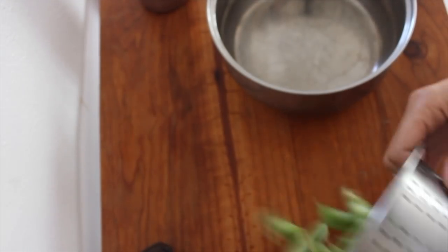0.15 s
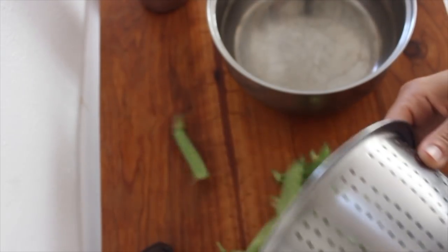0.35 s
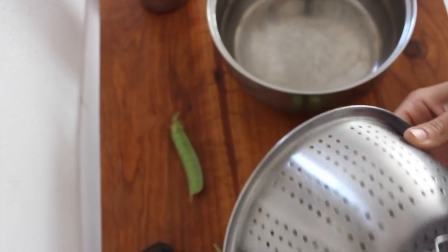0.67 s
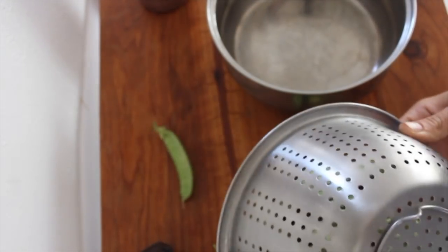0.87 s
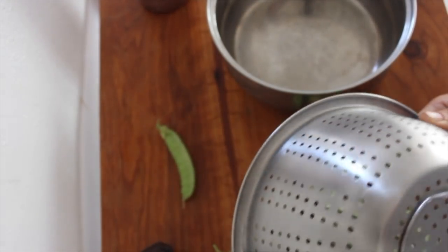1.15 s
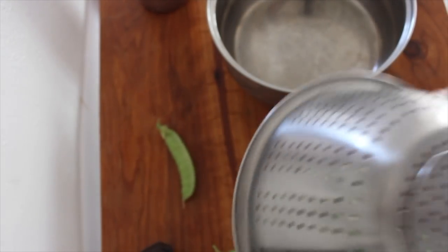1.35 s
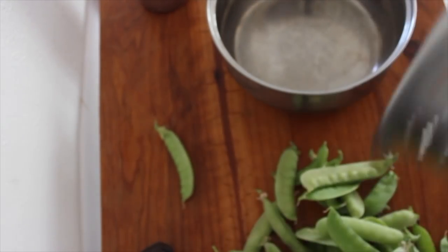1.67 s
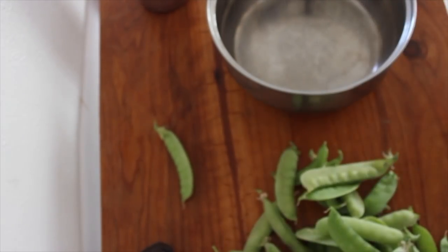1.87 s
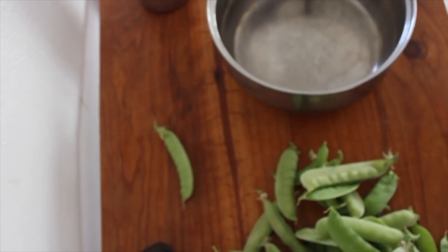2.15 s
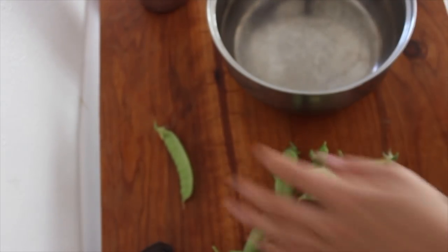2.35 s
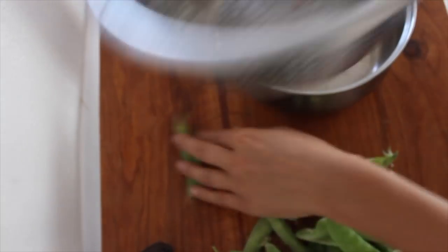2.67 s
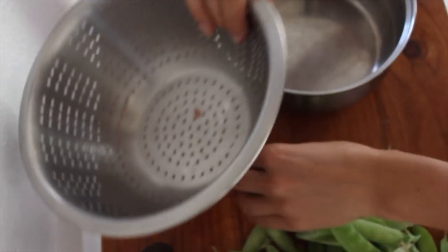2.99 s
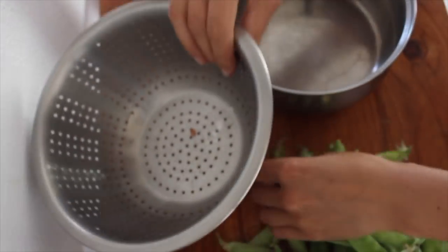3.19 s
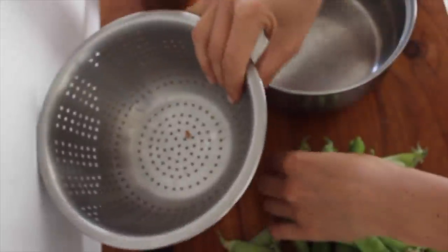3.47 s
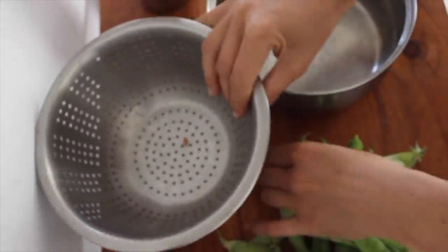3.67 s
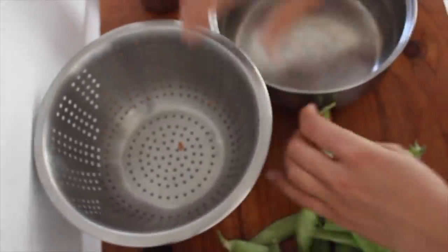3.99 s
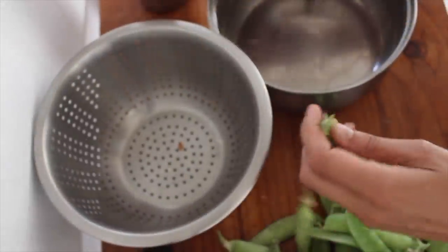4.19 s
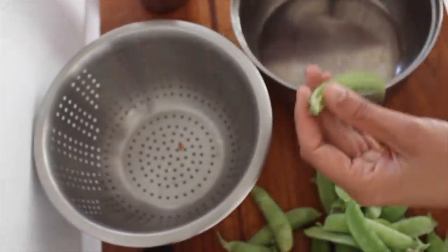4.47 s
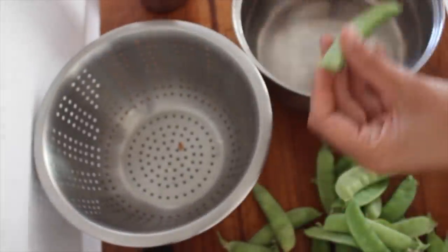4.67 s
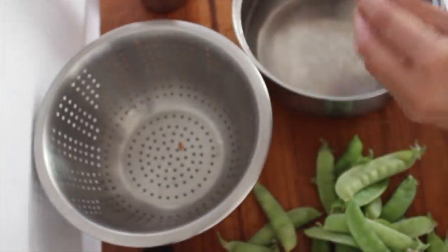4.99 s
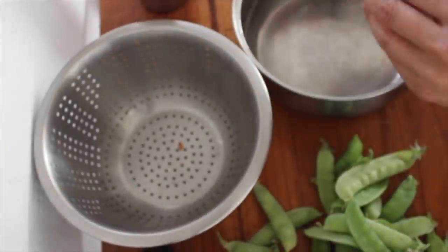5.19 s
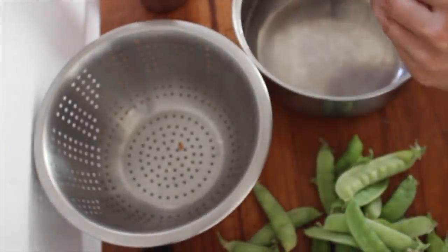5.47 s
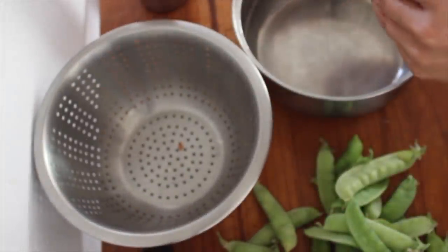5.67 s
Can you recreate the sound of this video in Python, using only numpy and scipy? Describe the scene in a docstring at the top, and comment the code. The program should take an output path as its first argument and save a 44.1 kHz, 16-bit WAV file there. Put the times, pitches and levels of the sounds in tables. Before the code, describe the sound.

A clattering spill of pods on wood fades to small ticks, followed by metallic clinks, short scrapes and dull table knocks in a quiet room.

```python
"""Pea pods are tipped from a steel colander onto a wooden table: each landing excites decaying table modes.
The colander is lifted, set down against a steel bowl and pushed along the wood, while a hand sweeps the pods
together: steel modes are struck or scraped, and filtered random grains make the rolling, dragging and rubbing.
Noise puffs are flicking pod tips; a decaying noise tail is the small room; noise bands are insects far off
through an open window, over a smooth hiss."""
import sys
import numpy as np
from scipy import signal
from scipy.fft import rfft, irfft
from scipy.io import wavfile

SR = 44100
rng = np.random.default_rng(int(sys.argv[2]) if len(sys.argv) > 2 else 0)


def waveform_to_disk(signal):
    """Save audio, clipped to [-1, 1], as 16-bit WAV at the path in sys.argv[1]."""
    frames = np.transpose(np.atleast_2d(signal))
    scaled = np.clip(frames, -1, 1) * 32767
    samples = np.round(scaled).astype(np.int16)
    wavfile.write(sys.argv[1], SR, samples)


def attenuation_scalar(level_db):
    """Turn a level in dB into a linear amplitude multiplier (20 dB per decade)."""
    decades = np.asarray(level_db, float) / 20
    return 10 ** decades


N = 257544

# Pods and colander landing on the table; levels are relative, the pitch is the one the struck spot favours:
# start_s, level_db, hardness_db, pitch_hz
LANDINGS = [(0.057, 5, -8.5, 292), (0.208, -16, -13, 322), (0.256, -4, -15, 750),
            (0.2768, -1.5, -12.5, 358), (0.2912, -7.5, -14, 407), (0.329, -9.5, -8, 494),
            (0.363, -9.5, -21, 293), (0.402, -1.5, -23, 330), (0.478, -16.5, -30, 280),
            (0.537, -11.5, -35, 285), (0.639, -22, -27, 650), (0.694, -11, -13.5, 338),
            (0.832, -16.5, -19, 338), (0.861, -17.5, -14.5, 370), (0.883, -14, -11, 386),
            (1.024, -26, -21, 339), (1.137, -27, -20, 464), (1.373, -29.5, -13, 304),
            (1.422, -30, -15, 480), (1.46, -25.5, -12, 357), (1.658, -29.5, -18, 368),
            (1.919, -27, -10, 342), (2.641, -24.5, -22.5, 280), (2.911, -27, -8, 406),
            (3.097, -35, -35, 333), (3.377, -27, -16, 385), (3.5041, -17.5, -39, 251),
            (3.559, -24, -17, 248), (3.818, -27, -27, 282), (3.984, -13, -14, 179.4),
            (4.301, -19, -38, 317), (4.344, -15, -44, 286), (4.582, -24.5, -27, 380)]
# Modes of the table top: frequency_hz, level_db, t60_s
TABLE_MODES = [(189, -10.5, 0.18), (259, -6, 0.13), (330.1, -2, 0.092), (480, 3.5, 0.022), (666, 8, 0.011),
               (764, 7, 0.012), (927.6, -5.5, 0.012)]
# High rings of the perforated colander wall when struck: frequency_hz, level_db, t60_s
WALL_MODES = [(6260, -1.5, 0.013), (6790, -10.5, 0.08), (7960, -3.5, 0.04), (8400, -7, 0.024),
              (8530, -6.5, 0.09), (9000, 3, 0.0085)]
# Pods tumble until then; later the smooth steel foot and the hand drag, with softer contacts.
TUMBLE_END_S = 1.55


def rms_one(x):
    """Normalisation: scales a signal to a root mean square of 1."""
    return x / np.sqrt(np.mean(x ** 2) + 1e-20)


def band(x, low_hz, high_hz):
    """Linear filtering: a Butterworth band-pass."""
    edges_hz = [low_hz, min(high_hz, 0.45 * SR)]
    return signal.sosfilt(signal.butter(2, edges_hz, "band", fs=SR, output="sos"), x)


def drift(rate_hz):
    """Slow random fluctuation: noise through two equal low-pass poles, rms 1."""
    step = 40  # samples between values of the slow signal
    pole = np.exp(-2 * np.pi * rate_hz * step / SR)
    noise = rng.standard_normal(N // step + 2002)
    slow = signal.lfilter([1], [1, -2 * pole, pole * pole], noise)[2000:]  # drop the settling filter
    return np.interp(np.arange(N) / step, np.arange(len(slow)), rms_one(slow))


def ring(force, hz, t60_s):
    """Damped resonance: a unit click sets a decaying sine of initial height 1 ringing."""
    radius = attenuation_scalar(-60 / (t60_s * SR))
    angle = 2 * np.pi * hz / SR
    feedback = [1, -2 * radius * np.cos(angle), radius * radius]
    return signal.lfilter([0, np.sin(angle)], feedback, force + 1e-18)


def strike(modes, times_s, levels_db, spots_hz, slope_db, chatter_s, chatter_db):
    """Modal excitation: clicks favour modes near a spot pitch, then micro-bounces chatter and die away.

    slope_db is the loss per octave away from the spot pitch."""
    at = np.round(np.asarray(times_s) * SR).astype(int)
    out = np.zeros(N)
    luck_db = 1.5 * rng.standard_normal((len(at), len(modes)))
    shiver = attenuation_scalar(chatter_db) * rng.standard_normal(N)
    for k, (hz, mode_db, t60_s) in enumerate(modes):
        distance_db = slope_db * np.abs(np.log2(hz / spots_hz))
        clicks = np.zeros(N)
        clicks[at] = attenuation_scalar(levels_db + mode_db + luck_db[:, k] - distance_db)
        chatter = shiver * signal.lfilter([1], [1, -np.exp(-1 / (chatter_s * SR))], clicks + 1e-18)
        out += ring((-1) ** k * clicks + chatter, hz, t60_s)
    return out


def grains(per_s, spread_db):
    """Shot noise: random small contacts of uneven size and either sign, rms 1."""
    sizes = attenuation_scalar(spread_db * np.minimum(rng.exponential(1, N), 4))
    signed_sizes = sizes * rng.choice([-1, 1], N)
    return rms_one(signed_sizes * (rng.random(N) < per_s / SR))


def stroke(start_s, rise_s, fade_s, level_db):
    """Amplitude envelope: start sample, and a smooth rise followed by an exponential fade."""
    t = np.arange(round((rise_s + 6 * fade_s) * SR)) / SR
    rise = np.sin(np.pi / 2 * t / rise_s) ** 2
    fade = np.exp((rise_s - t) / fade_s)
    return round(start_s * SR), attenuation_scalar(level_db) * np.where(t < rise_s, rise, fade)


def air():
    """Spectral shaping: steady noise of room air and preamplifier, a smooth hiss."""
    # Relative power density of the hiss: frequency_hz, density_db (per Hz)
    hiss_curve = [(20, -1.5), (60, -4), (250, -2.5), (750, 1), (1250, 0.5), (1600, -2.5), (4000, -7.5),
                  (8000, -5.5), (15500, -7.5)]
    curve_hz, curve_db = np.transpose(hiss_curve)
    hz = np.maximum(np.arange(N // 2 + 1) * SR / N, 1)
    shape_db = np.interp(np.log(hz), np.log(curve_hz), curve_db)
    spectrum = rfft(rng.standard_normal(N)) * attenuation_scalar(shape_db)
    return attenuation_scalar(-56.5) * rms_one(irfft(spectrum, N))


def insects():
    """Incoherent superposition: many far singers blur into wavering noise bands."""
    # Bands of the insect chorus: centre_hz, width_hz, level_db
    chorus = [(2980, 790, -65.5), (4870, 790, -64)]
    out = np.zeros(N)
    for hz, width_hz, level_db in chorus:
        voices = rms_one(band(rng.standard_normal(N), hz - width_hz / 2, hz + width_hz / 2))
        out += attenuation_scalar(level_db + 2.0 * drift(5.5)) * voices
    return out


def room(x):
    """Diffuse reverberation: dense echoes as a dying noise tail whose treble dies sooner."""
    t60_s, wall_cut_hz = 0.42, 3300
    t = np.arange(SR // 2) / SR
    hiss = rng.standard_normal(len(t)) * np.minimum(t / 0.0021, 1)
    dull = band(hiss, 80.3, wall_cut_hz)
    dull_tail = dull * attenuation_scalar(-60 * t / t60_s)
    bright_tail = 0.8 * (hiss - dull) * attenuation_scalar(-60 * t / (0.5 * t60_s))
    tail = dull_tail + bright_tail
    return signal.fftconvolve(x, tail / np.sqrt(np.sum(tail ** 2)))[:N]


def rub():
    """Dry friction: fine grains in slight clumps, each stroke band-limited above its own lowest pitch."""
    # Skin, pods and rim rubbing: start_s, rise_s, fade_s, level_db, lowest_hz
    rubs = [(0.048, 0.0027, 0.26, -41, 2640), (.21, 0.022, 0.16, -38.5, 2720),
            (.70, 0.048, 0.033, -43, 2220), (.838, 0.0069, 0.18, -48, 2050),
            (1.248, 0.0075, 0.33, -59, 1470), (2.04, 0.042, 0.01, -47, 11400),
            (2.233, 0.042, 0.068, -49, 2830), (2.471, 0.047, 0.065, -53, 1730),
            (2.62, 0.017, 0.022, -44.5, 5700), (3.144, 0.011, 0.068, -35.5, 1350),
            (3.50, 0.012, 0.034, -46, 1080), (3.778, 0.014, 0.025, -43.5, 2600),
            (3.865, 0.0041, 0.2, -52, 3000), (3.98, 0.01, 0.023, -38.5, 1050),
            (4.244, 0.02, 0.013, -50, 2490), (4.29, 0.029, 0.171, -56.5, 587)]
    span_octaves, top_hz = 2.31, 15300
    out = np.zeros(N)
    friction = grains(11000, spread_db=1.0) * attenuation_scalar(2.7 * drift(48))
    tumbling = np.arange(N) < TUMBLE_END_S * SR
    # While pods still roll, the friction is less even and their tips add lone ticks.
    lone_ticks = tumbling * attenuation_scalar(-2) * grains(250, spread_db=3.2)
    friction = friction * attenuation_scalar(tumbling * 3 * drift(60)) + lone_ticks
    for start_s, rise_s, fade_s, level_db, low_hz in rubs:
        at, envelope = stroke(start_s, rise_s, fade_s, level_db)
        envelope = envelope[:N - at]
        end = at + len(envelope)
        high_hz = min(low_hz * 2 ** span_octaves, top_hz)
        out[at:end] += envelope * rms_one(band(friction[at:end], low_hz, high_hz))
    return out


def scrape():
    """Stick-slip excitation: gritty slips stir the high rings of the colander wall."""
    # The wall scraped by sliding pods, then through its foot; the pitch is the one favoured:
    # start_s, rise_s, fade_s, level_db, pitch_hz
    scrapes = [(.25, 0.043, 0.15, -47, 8500), (0.722, 0.037, 0.098, -47.5, 8600),
               (3.147, 0.014, 0.042, -38.5, 9100), (3.45, 0.026, 0.35, -49.5, 9000),
               (3.749, 0.057, 0.037, -45, 7300), (3.868, 0.0059, 0.089, -45.5, 8200),
               (4.30, 0.016, 0.18, -47, 6300), (4.44, 0.11, 0.0073, -63, 7030)]
    out = np.zeros(N)
    slips = grains(800, spread_db=2.0)
    for start_s, rise_s, fade_s, level_db, spot_hz in scrapes:
        at, envelope = stroke(start_s, rise_s, fade_s, level_db)
        force = slips[at:at + len(envelope)]
        rings = np.zeros(len(force))
        for hz, mode_db, t60_s in WALL_MODES:
            mode_gain = attenuation_scalar(mode_db - 11 * abs(np.log2(hz / spot_hz)))
            rings += mode_gain * ring(force, hz, 0.61 * t60_s)  # shorter than when struck
        out[at:at + len(envelope)] += envelope * rms_one(rings)
    return out


def drag():
    """Rolling excitation: pod taps, later dense bumps, keep the table modes sounding; the legs sway below."""
    # Relative level of rolling and dragging on the table: time_s, level_db
    roll_curve = [(.05, -68), (.08, -22.5), (.21, -52), (.252, -38), (.285, -24.5), (.6, -47.5), (.95, -41),
                  (1.35, -60), (1.9, -55), (2.5, -76.5), (2.9, -58), (3.47, -51.5), (3.53, -34.5),
                  (3.72, -51.5), (4.03, -33), (4.22, -57.5), (4.33, -34.5), (4.6, -42.5), (4.72, -75.5)]
    t = np.arange(N) / SR
    curve_s, curve_db = np.transpose(roll_curve)
    roll_db = np.interp(t, curve_s, curve_db)
    tumbling = np.arange(N) < TUMBLE_END_S * SR
    bumps = grains(2500, spread_db=3.0)
    taps = rms_one(band(grains(550, spread_db=4), 130, 1500))
    soft_bumps = rms_one(band(bumps, 170, 810))
    grit = rms_one(band(np.where(tumbling, taps, bumps), 280, 2600))
    contacts = np.where(tumbling, taps, soft_bumps)
    roll = np.zeros(N)
    for k, (hz, mode_db, t60_s) in enumerate(TABLE_MODES):
        roll += (-1) ** k * attenuation_scalar(mode_db) * ring(contacts, hz, t60_s)
    rolling = attenuation_scalar(roll_db + 1.0 * drift(34)) * rms_one(rms_one(roll) + attenuation_scalar(-7.0) * grit)

    push = rng.standard_normal(N)
    sway = attenuation_scalar(-1.0) * rms_one(band(push, 18, 25)) + rms_one(band(push, 50, 82))
    sway += ~tumbling * rms_one(band(push, 53, 140))
    # The legs sway with a share of the dragging swing, and each landing shakes them for a while.
    shake_s = 0.11  # decay time constant
    jolts = np.zeros(N)
    for start_s, level_db, *_ in LANDINGS:
        jolts[round(start_s * SR)] = attenuation_scalar(-35.5 + 0.6 * level_db)
    shake = signal.lfilter([1], [1, -np.exp(-1 / (shake_s * SR))], jolts + 1e-18)
    swing = attenuation_scalar(-50 + 0.88 * (roll_db + 50))
    light_pods = attenuation_scalar(-5.5 * tumbling)  # tumbling pods move the legs less than the hand does
    return rolling + light_pods * np.hypot(swing, shake) * rms_one(sway)


def bowl():
    """Lightly damped modes: clear rings outlast the clatter; a nudge wakes little but the nearest one."""
    # Steel walls left free to ring: frequency_hz, level_db, t60_s
    free_modes = [(323, 0, .35), (445, 0, .2), (1120, 0, 0.13), (1190, -1, 0.085), (1960, 0, 1),
                  (2130, 0, 0.3), (2740, 0, 0.5), (3079, 2, 0.23)]
    # Light nudges on a free wall, with the pitch favoured: start_s, level_db, pitch_hz
    nudges = [(0.775, -35, 1190), (.937, -32, 1190), (0.9668, -28, 1200), (0.981, -26, 1180),
              (1.38, -41, 1180), (2.903, -38, 1120), (2.945, -43, 445), (3.05, -47, 323), (3.097, -38, 323),
              (3.575, -43, 2130), (3.889, -46, 2740), (3.983, -36, 3079), (3.994, -30, 3079),
              (3.991, -46, 1960)]
    start_s, level_db, spot_hz = np.transpose(nudges)
    return strike(free_modes, start_s, level_db, spot_hz, slope_db=200, chatter_s=0.006, chatter_db=-31)


def ticks():
    """Transient noise: pod tips and stems flick as puffs of a few milliseconds around their own pitch."""
    # Flicks: start_s, peak_db, pitch_hz
    flicks = [(0.039, -18.5, 14600), (0.167, -29, 5860), (0.1832, -21.5, 14200), (0.2216, -21, 8400),
              (0.2324, -14, 12400), (0.264, -26, 6200), (0.4195, -26.5, 4320), (0.6437, -33, 4600),
              (0.7442, -31.5, 2500), (0.867, -24, 2290), (1.0067, -38, 6800), (1.0267, -37, 2360),
              (1.143, -22.5, 14200), (1.2645, -37.5, 2980), (1.419, -41, 5470), (3.116, -33, 8200),
              (3.573, -35, 3980)]
    size = 600  # samples in a puff
    out = np.zeros(N)
    decay = np.exp(-np.arange(size) / SR / 0.0037)
    for start_s, peak_db, hz in flicks:
        puff = band(rng.standard_normal(size) * decay, hz / 1.3, hz * 1.3)
        at = round(start_s * SR)
        out[at:at + size] += attenuation_scalar(peak_db) * puff / np.max(np.abs(puff))
    return out


def clinks():
    """Impact of steel on steel: rim contacts excite low modes and the short high rings of the wall."""
    # Contacts, levels relative, with the pitch favoured: start_s, level_db, treble_db, pitch_hz
    contacts = [(3.4365, -33, 13, 2580), (3.505, -14, -13, 2250), (3.559, -20.5, -13, 1850),
                (3.57, -27, 1, 1680), (3.8203, -18.5, -30, 2010), (3.948, -15.5, -12, 2250),
                (3.9825, -16, -2, 3100), (3.993, -17.5, -18.5, 1410), (4.252, -43.5, 18.5, 3460)]
    # Lower modes of the colander: frequency_hz, level_db, t60_s
    body_modes = [(1335, -1, 0.04), (1710, 0, 0.05), (2180, 4, 0.013), (2600, 0, 0.025), (3100, -1, 0.015),
                  (3870, 0, 0.008), (5100, -3, 0.02)]
    start_s, level_db, treble_db, spot_hz = np.transpose(contacts)
    body = strike(body_modes, start_s, level_db - 9.0, spot_hz,
                  slope_db=9.5, chatter_s=0.011, chatter_db=-25.5)
    wall = strike(WALL_MODES, start_s, level_db + treble_db - 15.5, 8440,
                  slope_db=35, chatter_s=0.0056, chatter_db=-14.5)
    return body + wall


def knocks():
    """Impact on a plate: landings ring the top and the struck spot; hardness decides the upper modes."""
    # Upper table and wall modes that only hard contacts reach: frequency_hz, level_db, t60_s
    hard_modes = [(1540, 2, 0.0068), (1910, -5, 0.019), (2250, -5, 0.0084), (2674, -7, 0.0036)]
    start_s, level_db, hard_db, spot_hz = np.transpose(LANDINGS)
    soft = strike(TABLE_MODES, start_s, level_db - 16.0, spot_hz,
                  slope_db=7.0, chatter_s=0.02, chatter_db=-23)
    hard = strike(hard_modes, start_s, level_db + hard_db - 11.5, 2200,
                  slope_db=1.0, chatter_s=0.0074, chatter_db=-11.5)
    spot = np.zeros(N + SR)
    t = np.arange(SR // 8) / SR
    rise = 1 - np.exp(-t / 0.0009)
    for at, db, hz in zip(np.round(start_s * SR).astype(int), level_db, spot_hz):
        # Cycles of the spot's own pitch in a 60 dB decay: a soft pod damps it sooner.
        cycles = 7 if at < TUMBLE_END_S * SR else 26
        decay = attenuation_scalar(db - 5 - 60 * t * hz / cycles)
        spot[at:at + len(t)] += decay * rise * np.sin(2 * np.pi * hz * t)
    return band(soft + hard + spot[:N], 110, 7200)  # the knocks carry little below 110 Hz


def scene():
    """Superposition at one point: two capsules differ by a faint hiss and a wavering slight gain mismatch."""
    blows = knocks() + clinks()
    flicks = ticks()
    echoes = attenuation_scalar(-10) * room(blows + attenuation_scalar(-0.5) * flicks)
    contacts = drag() + rub() + scrape()
    mid = blows + bowl() + flicks + echoes + contacts + air() + insects()
    capsule_hiss = attenuation_scalar(-64) * rms_one(band(rng.standard_normal(N), 1710, 19845))
    side = capsule_hiss + attenuation_scalar(-50.5) * drift(30) * mid
    return np.array([mid + side, mid - side])


def top_cut(x):
    """Nothing passes above the cut-off."""
    return signal.sosfilt(signal.butter(12, 16820, fs=SR, output="sos"), x)


def record(dry):
    """Clipping and band limitation: peaks flatten at full scale, then a steep low-pass cuts the top."""
    clipped = np.clip(dry, -1, 1)
    low_pass = signal.cheby2(10, 30, 16100, fs=SR, output="sos")  # 30 dB down from 16100 Hz
    return top_cut(signal.sosfilt(low_pass, clipped))


dry = scene()
out = record(dry)
waveform_to_disk(out)
```